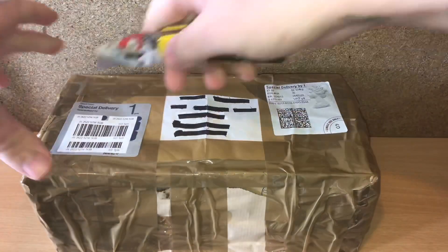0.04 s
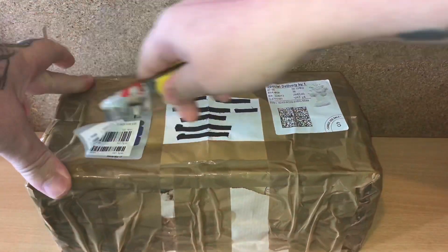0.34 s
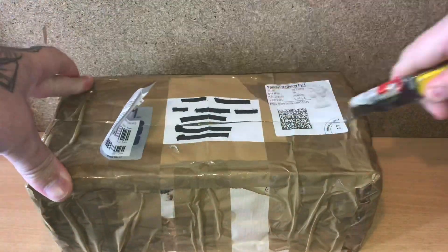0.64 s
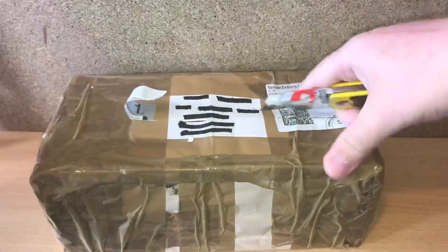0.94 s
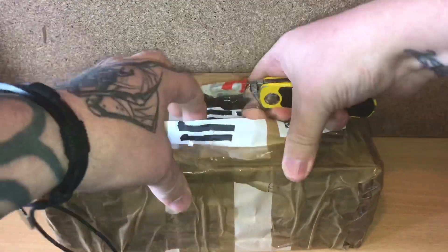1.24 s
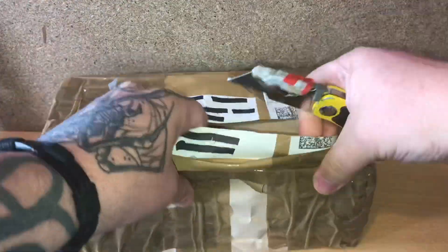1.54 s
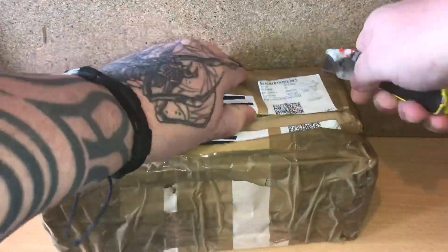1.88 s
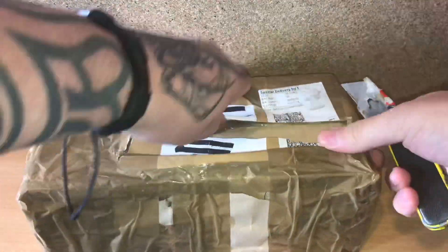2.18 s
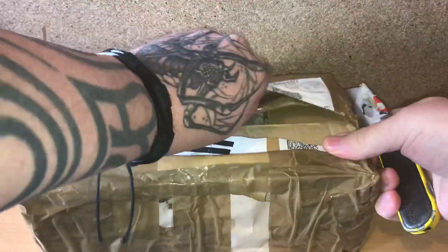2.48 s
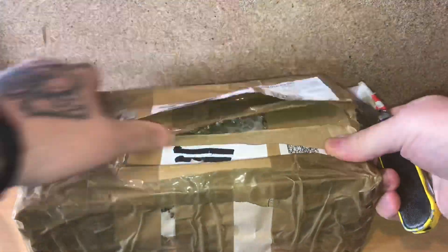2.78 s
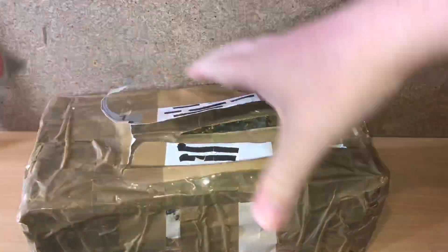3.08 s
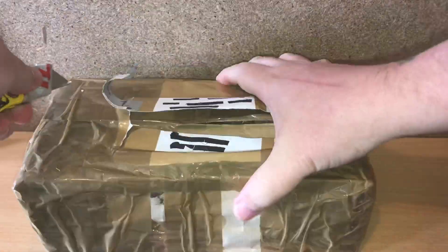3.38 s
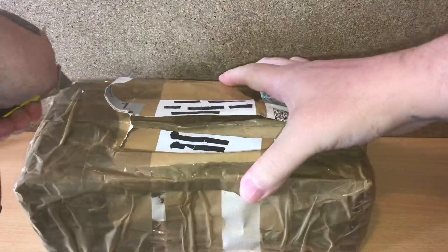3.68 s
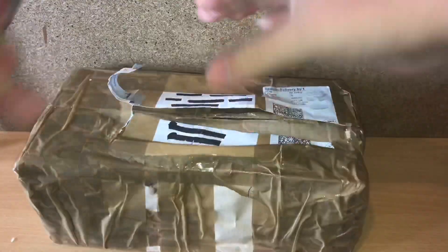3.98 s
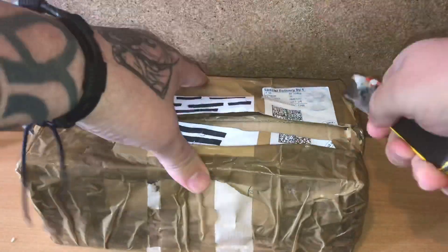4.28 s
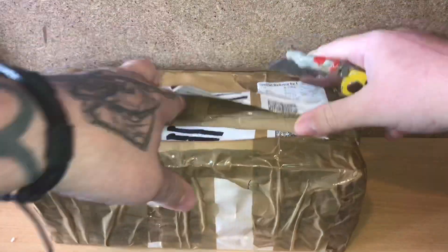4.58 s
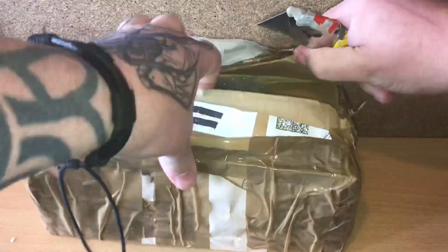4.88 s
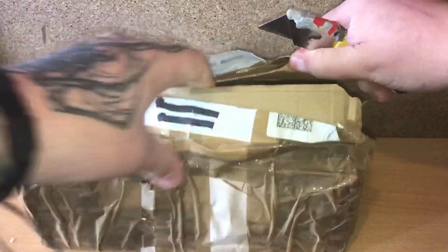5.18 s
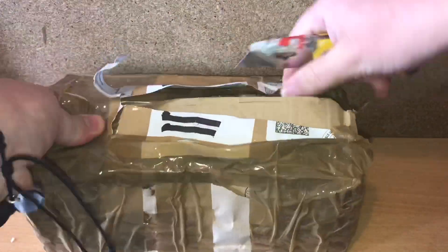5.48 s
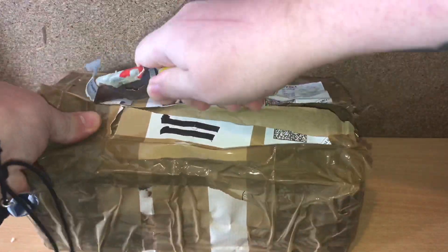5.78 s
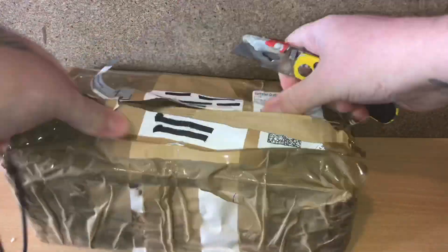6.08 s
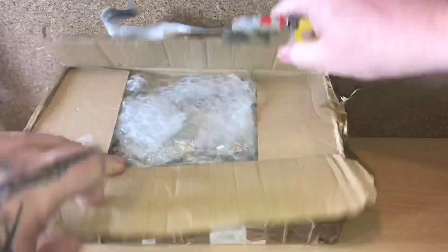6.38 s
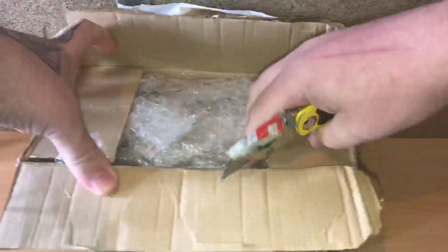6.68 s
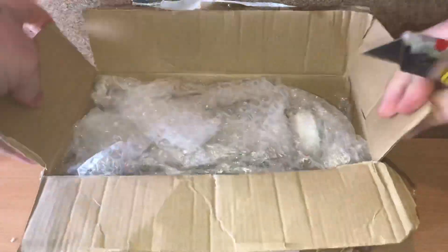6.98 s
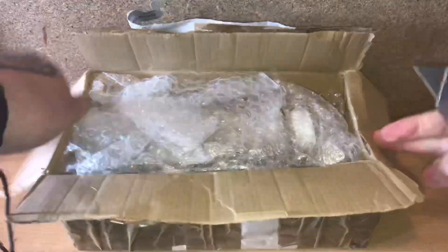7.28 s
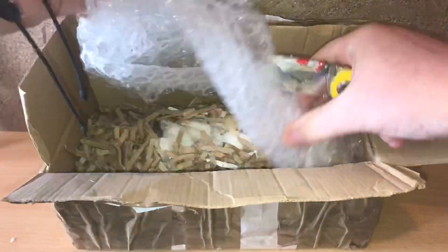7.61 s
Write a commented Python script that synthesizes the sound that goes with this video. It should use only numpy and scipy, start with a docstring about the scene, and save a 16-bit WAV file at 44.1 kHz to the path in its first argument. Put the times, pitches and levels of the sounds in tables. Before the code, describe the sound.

Close, dry scratching and crackling as a taped cardboard box is cut, snapped open and shifted on a desk in a quiet room.

```python
"""A utility knife scratches through packing tape: a cardboard parcel is opened on a wooden desk, close by
in a small, quiet room. The taut film snaps and rips as the lid is prised up, the box is dragged about,
the flaps pop open and bubble wrap rustles. Rubbing and tearing are stick-slip motion; each snap is a
sudden release of elastic energy. These excite the modes of the box and reflect off desk and wall."""
import sys
import numpy as np
from scipy import signal
from scipy.fft import rfft, irfft
from scipy.io import wavfile
from scipy.ndimage import uniform_filter1d

SR = 44100
rng = np.random.default_rng(int(sys.argv[2]) if len(sys.argv) > 2 else 0)


def inscribe(sig):
    """Save sig as 16-bit PCM at rate SR to the path in sys.argv[1].

    A 1-D sig is mono; a 2-D sig holds one channel per row.
    Samples are clipped to [-1, 1] before scaling.
    """
    pcm = np.round(np.clip(np.atleast_2d(sig).T, -1, 1) * 32767)
    wavfile.write(sys.argv[1], SR, pcm.astype(np.int16))


N = 341581
TIME = np.arange(N) / SR


def amp(db):
    """Amplitude ratio of a level in decibels."""
    return 10 ** (np.asarray(db) / 20)


def unit_rms(x):
    """Normalisation to a mean power of 1."""
    return x / np.sqrt(np.mean(x ** 2) + 1e-20)


def unit_energy(x):
    """Normalisation to a total energy of 1."""
    return x / np.sqrt(np.sum(x ** 2) + 1e-20)


def curve_at(points, hz):
    """Interpolation of (frequency [Hz], value) points on a logarithmic frequency axis."""
    f, value = np.transpose(points)
    return np.interp(np.log(hz + 1), np.log(f + 1), value)


def add(mix, start_s, sound):
    """Superposition of a sound on the mix."""
    part = mix[max(round(start_s * SR), 0):][:len(sound)]
    part += sound[:len(part)]


def band(x, low_hz, high_hz, order):
    """Causal Butterworth band-pass."""
    edges_hz = [low_hz, min(high_hz, .49 * SR)]
    return signal.sosfilt(signal.butter(order, edges_hz, "band", fs=SR, output="sos"), x)


def colour(x, spectrum, size=2048):
    """Minimum-phase filtering: the spectrum is shaped while clicks keep their sharp fronts."""
    log_gain = np.log(amp(curve_at(spectrum, abs(np.fft.fftfreq(size, 1 / SR)))))
    taps = np.fft.ifft(np.exp(np.conj(signal.hilbert(log_gain)))).real
    return signal.oaconvolve(x, taps[:size // 2])[:len(x)]


def wander(rate_hz):
    """Random modulation of rms 1, confined to the decade below rate_hz."""
    hz = np.fft.rfftfreq(N, 1 / SR)
    return unit_rms(irfft(rfft(rng.standard_normal(N)) * (hz < rate_hz) * (hz > rate_hz / 10), N))


# Background noise of the room: (frequency [Hz], relative spectral level [dB])
AIR_SPECTRUM = [(12, -28), (20, -5), (172, -14), (262, -16), (337, -19), (399, -18.5), (499, -25),
                (574, -21), (976, -20), (1530, -26.5), (1860, -22.5), (4060, -32), (16000, -36.5)]


def air(level_db=-69):
    """Stationary noise: the faint rumble and hiss of the room."""
    gain = amp(curve_at(AIR_SPECTRUM, np.fft.rfftfreq(N, 1 / SR)))
    return amp(level_db) * unit_rms(irfft(rfft(rng.standard_normal(N)) * gain, N))


# Reverberation time of the room: (frequency [Hz], T60 [s])
ROOM_DECAY = [(150, .38), (500, 0.22), (2000, 0.48), (6000, 0.24), (15000, 0.11)]


def room(x, early_db=-9.0, early_t60=0.051, tail_db=-32.5, turns_per_s=1.723, paths=4):
    """Early reflections off desk and wall shift as the hands move; faint diffuse reverberation follows."""
    t = np.arange(SR // 2) / SR
    early = 0
    for k in range(paths):
        taps = rng.standard_normal(len(t)) * (rng.random(len(t)) < .15) * (t > .0012)
        echoes = unit_energy(taps * amp(-60 * t / early_t60))
        weight = np.sqrt(2 / paths) * np.cos(np.pi * (turns_per_s * TIME + k / paths))  # squares sum to 1
        early = early + signal.oaconvolve(x * weight, echoes)[:N]
    hz, age, noise = signal.stft(rng.standard_normal(len(t)) * (t > .008), SR, nperseg=256)
    decay = amp(-60 * age / curve_at(ROOM_DECAY, hz)[:, None])
    tail = unit_energy(signal.istft(noise * decay, SR, nperseg=256)[1][:len(t)])
    return x + amp(early_db) * early + amp(tail_db) * signal.oaconvolve(x, tail)[:N]


# Modes of the box: (frequency [Hz], resonance gain [dB re direct sound], T60 [s])
BOX_MODES = [(168, -7.5, 0.047), (188.2, 1.5, 0.16), (250, -14, 0.45), (437, 6.5, 0.041),
             (1086, -6.5, 0.017), (1298, 1, 0.03), (1888, -24.5, 0.032), (2910, -7, 0.016),
             (3630, -10, 0.042), (3730, -21.5, 0.16), (4450, -22, 0.24)]


def box(x, gain_db=-1.0):
    """Modal resonance: panels and cavity ring as damped oscillators after each push."""
    t = np.arange(SR // 4) / SR
    response = signal.unit_impulse(len(t))
    for hz, mode_db, t60 in BOX_MODES:
        damping = np.log(1000) / t60
        response += amp(mode_db) * 2 * damping / SR * np.exp(-damping * t) * np.cos(2 * np.pi * hz * t)
    return amp(gain_db) * signal.oaconvolve(x, response)[:N]


# Low thuds of the box as it is bumped, tape rips and a flap pops open:
# (time [s], level [dB], frequency [Hz], T60 [s])
BOX_THUDS = [(0.209, -52, 320, 0.025), (1.486, -51, 189.5, 0.16), (2.555, -47.5, 173.9, 0.26),
             (2.582, -56, 93.4, 0.073), (3.978, -54, 500.4, 0.12), (4.349, -49.5, 200, 0.15),
             (4.36, -46, 445.6, 0.14), (4.584, -52, 524, 0.055), (5.031, -50.5, 115, 0.065),
             (5.972, -41, 491, 0.07), (6.198, -35, 210, 0.048), (6.198, -38, 79, 0.039)]


def thuds():
    """Free vibration: a sudden push sets one low, damped note going."""
    out, t = np.zeros(N), np.arange(SR // 4) / SR
    for start, level_db, hz, t60 in BOX_THUDS:
        add(out, start, amp(level_db - 60 * t / t60) * np.sin(2 * np.pi * hz * t))
    return out


def patch_ring(x, hz, q):
    """Local resonance: a small patch of card or film rings for a few cycles."""
    return signal.lfilter(*signal.iirpeak(min(hz, .45 * SR), q, SR), x)


def slip(creak, decay_s=0.00062):
    """Impulsive excitation: one tiny slip ticks and rings the patch it happens on."""
    t = np.arange(SR // 100) / SR
    tick = unit_energy(np.exp(-t / decay_s) * rng.standard_normal(len(t)))
    patch_hz = 900 * 16 ** rng.random()
    return unit_energy(tick + creak * unit_energy(patch_ring(tick, patch_hz, q=4.8)))


def moving_contact(x, depth_db=2.5):
    """Time-varying filtering: resonances come and go as the contact travels over the card."""
    spectra = signal.stft(x, nperseg=256)[2]
    patches = uniform_filter1d(rng.standard_normal(spectra.shape), size=4, axis=0)
    patches = uniform_filter1d(patches, size=12, axis=1)  # each lasts a few hundredths of a second
    return signal.istft(spectra * amp(depth_db * unit_rms(patches)), nperseg=256)[1][:len(x)]


def pressure(t, attack_s, start, length, level_db, swell_db, release_s=0.012):
    """Stroke envelope: contact builds, swells or eases by swell_db, passing level_db midway, and lets go."""
    age = t - start
    contact = np.clip(age / attack_s, 0, 1) * np.exp(-np.maximum(age - length, 0) / release_s)
    return contact * amp(level_db + swell_db * (np.clip(age / length, 0, 1) - .5))


def friction(strokes, spectrum, attack_s, gain_db, slips_per_s, spread_db, hiss, clump_db, creak):
    """Stick-slip friction: clumps of tiny slips over a smooth hiss; card gives the lows, film the top."""
    shape_count, split_hz = 32, 6500
    first, last = strokes[0][0], strokes[-1][0] + strokes[-1][1]
    t = TIME[round(first * SR):round((last + .06) * SR)]
    n = len(t)
    sizes = amp(spread_db * np.minimum(rng.exponential(1, n), 3))
    impulses = sizes * (rng.random(n) < slips_per_s / SR)
    shape = rng.integers(0, shape_count, n)
    slips = sum(signal.oaconvolve(impulses * (shape == k), slip(creak))[:n] for k in range(shape_count))
    drive = (unit_rms(slips) + hiss * rng.standard_normal(n)) * amp(clump_db * wander(rate_hz=110)[:n])
    sound = colour(moving_contact(drive), spectrum)
    card = unit_rms(band(sound, 60, split_hz, order=4))
    film = unit_rms(band(sound, split_hz, 21000, order=4))
    card_envelopes = [pressure(t, attack_s, *stroke) for *stroke, _ in strokes]
    film_envelopes = [envelope * amp(stroke[-1]) for envelope, stroke in zip(card_envelopes, strokes)]
    card *= np.linalg.norm(card_envelopes, axis=0)  # overlapping strokes add in power
    film *= np.linalg.norm(film_envelopes, axis=0)
    out = np.zeros(N)
    add(out, first, amp(gain_db) * (card + film))
    return out


# Rustles of wrap: (time [s], duration [s], level [dB], swell [dB], film hiss [dB re level])
WRAP_STROKES = [(7.32, 0.18, -54.5, -2.5, 0), (7.5, 0.221, -55.5, 3, 0)]
# Their spectrum: (frequency [Hz], gain [dB])
WRAP_SPECTRUM = [(150, -40), (250, -13), (273, -22), (429, -10), (576, -11), (1310, -5), (1550, -5),
                 (2320, -0.5), (6140, -9.5), (14900, 11), (16000, 5.5)]


def bubble_wrap():
    """Friction of thin film: a bright rustle."""
    return friction(WRAP_STROKES, WRAP_SPECTRUM, attack_s=0.0068, gain_db=-0.5,
                    slips_per_s=1800, spread_db=3.0, hiss=1.0, clump_db=1.9, creak=0.56)


# Card sliding on card: (time [s], duration [s], level [dB], swell [dB], film hiss [dB re level])
SCRAPE_STROKES = [(5.15, 0.032, -60, 5, -3), (5.335, 0.028, -49.5, -3, -4.5),
                  (6.36, 0.067, -57, 5.5, -13.5), (6.675, 0.17, -49.5, -11.5, -5.5),
                  (6.839, 0.225, -54, 4.5, -5.5), (7.081, 0.12, -56, -4.5, -3.5),
                  (7.22, 0.0768, -56, -3, 0)]
# Its spectrum: (frequency [Hz], gain [dB])
SCRAPE_SPECTRUM = [(150, -53), (250, -28), (300, -7), (430, -13), (600, -6), (1060, -5.5), (1550, -0.5),
                   (2300, 4), (3700, -4.5), (5500, -12), (8000, -14), (14400, -9), (16000, -7.5)]


def card_scrapes():
    """Sliding friction: slips of nearly equal size ring the card."""
    return friction(SCRAPE_STROKES, SCRAPE_SPECTRUM, attack_s=0.03, gain_db=-1.0,
                    slips_per_s=1500, spread_db=1.0, hiss=0.96, clump_db=3.0, creak=1.0)


# Flaps being opened: (time [s], duration [s], level [dB], swell [dB], film hiss [dB re level])
FLAP_STROKES = [(4.38, 0.4, -61.5, -8.5, -2), (4.611, 0.23, -60, 11, -1), (4.771, .1, -58, 5, 1.5),
                (4.871, 0.064, -60, -6, -1.5), (4.94, 0.14, -53, -3.5, -4), (5.098, 0.089, -50.5, -0.5, -4),
                (5.191, 0.28, -62, 5, 0.5), (5.48, 0.066, -78, -1, 2), (5.549, 0.42, -60, 8, -3),
                (5.824, 0.07, -48, 10.5, 0), (5.9, 0.17, -56.5, 3.5, -5), (6.058, 0.126, -53.5, -6, -4.5),
                (6.22, 0.2233, -55, 8.5, -2), (6.461, .21, -60, -2, -2.5)]
# Their spectrum: (frequency [Hz], gain [dB])
FLAP_SPECTRUM = [(71, -61), (120, -12), (196, -7), (327, -13), (436, -10.5), (605, -13.5), (670, -5),
                 (1320, -6), (2110, -6.5), (3660, -10), (6630, -19), (14700, -11.5), (16000, -9)]


def flaps():
    """Intermittent friction: the flaps catch and slide in slips of very uneven size."""
    return friction(FLAP_STROKES, FLAP_SPECTRUM, attack_s=0.01, gain_db=-0.5,
                    slips_per_s=800, spread_db=6.0, hiss=0.8, clump_db=4.0, creak=0.56)


# Box sliding on the desk: (time [s], duration [s], level [dB], swell [dB], film hiss [dB re level])
DRAG_STROKES = [(3.625, 0.2012, -43.5, 12, -8.5), (3.89, 0.029, -47, 2.22, -2), (3.97, 0.27, -71, 4.5, 0.5),
                (4.235, 0.13, -43, 3.4, -7)]
# Its spectrum: (frequency [Hz], gain [dB])
DRAG_SPECTRUM = [(71, -60), (120, -25), (200, -10.5), (314, -24), (445, -5), (513, -17.5), (700, -1.5),
                 (1370, -3.5), (2300, -1.5), (3900, -10), (5400, -23), (15000, -22), (16000, -16)]


def box_drag():
    """Sliding friction of card on wood: dense slips merge into a rasp."""
    return friction(DRAG_STROKES, DRAG_SPECTRUM, attack_s=0.025, gain_db=-1.0,
                    slips_per_s=3000, spread_db=4.0, hiss=0.9, clump_db=2.7, creak=0.36)


# Hands on the tape: (time [s], duration [s], level [dB], swell [dB], film hiss [dB re level])
TAPE_STROKES = [(1.94, .38, -60.5, 7.5, -3.5), (2.32, .4, -61, -1, 4.5), (2.719, .12, -60.5, -2.5, -2),
                (2.85, 0.2, -77, -5.5, 1), (3.07, .56, -71, -8.5, -3)]
# The crinkle's spectrum: (frequency [Hz], gain [dB])
TAPE_SPECTRUM = [(71, -57.5), (120, -15.5), (167, -2), (231, -16.5), (418, -15.5), (513, -12), (1320, -9.5),
                 (2480, -9), (3900, -18.5), (5520, -25.5), (16000, -20)]


def tape_crinkle():
    """Sparse stick-slip: tape crinkles under the hands."""
    return friction(TAPE_STROKES, TAPE_SPECTRUM, attack_s=0.012, gain_db=-1.0,
                    slips_per_s=450, spread_db=4.5, hiss=0.82, clump_db=1.5, creak=.8)


# Cuts of the knife: (time [s], duration [s], level [dB], swell [dB], film hiss [dB re level])
BLADE_STROKES = [(.15, 0.1486, -59.5, 22, -7), (.265, 0.34, -49, -5, -4.5), (0.531, 0.088, -45.5, -1, -15),
                 (.64, 0.19, -66.5, 3, -5), (.74, 0.0596, -57, 2, -7.5), (.85, 0.15, -75, 7, 0),
                 (.885, 0.051, -64, 9, -2.5), (1.005, 0.21, -54.5, 8, -7.5),
                 (1.198, .255, -51.5, -11.5, -0.5), (1.465, .18, -53, 0, 1.5), (1.67, .14, -56.5, 6, -5.5),
                 (1.818, 0.1, -48, 16, -6.5)]
# Their spectrum: (frequency [Hz], gain [dB])
BLADE_SPECTRUM = [(71, -59), (120, -22.5), (236, -12.5), (314, -24), (436, -12), (569, -17), (684, -2),
                  (1290, -5.5), (1550, -1.5), (6370, -20.5), (13500, -9.5), (16000, -13.5)]


def blade():
    """Cutting friction: the blade saws through tape in clumps of dry slips."""
    return friction(BLADE_STROKES, BLADE_SPECTRUM, attack_s=0.0138, gain_db=-1.5,
                    slips_per_s=1600, spread_db=2.5, hiss=0.98, clump_db=4.0, creak=0.24)


# Bands of a break, in the order body, thump, crack, film tick:
# (low edge [Hz], high edge [Hz], gain [dB], decay stretch [ratio])
FRACTURE_BANDS = [(861, 1960, -1.4, 0.82), (200, 774, -7, 2.8), (2040, 4400, -1, 1.6),
                  (9400, 19600, -0.88, 1.3)]


def fracture(force, body_db, crack_db, tick_db, tuning=1, ring=0, front=0):
    """Transient radiation: the envelope force(stretch) jolts, then shakes card and film in four bands."""
    thump_db = -17.5 - 0.43 * tick_db  # the more of a break is film, the less it pushes the box
    shares_db = [0, thump_db, crack_db, tick_db]
    card_hz, crack_hz = 1250, 2850 * 2 ** (0.18 * crack_db)  # the crack's note rises with its hardness
    notes_hz = [card_hz, card_hz, crack_hz, crack_hz]
    out = 0
    for share_db, hz, (low_hz, high_hz, gain_db, stretch) in zip(shares_db, notes_hz, FRACTURE_BANDS):
        envelope = force(stretch)
        drives = np.array([np.diff(envelope, prepend=0), envelope * rng.standard_normal(len(envelope))])
        ringing = ring * patch_ring(drives, hz * tuning, q=3.1)
        jolt, shake = band(drives + ringing, low_hz, high_hz, order=2)
        burst = unit_energy(front * unit_energy(jolt) + unit_energy(shake))
        out = out + amp(body_db + share_db + gain_db) * burst
    return out


def snap(body_db, crack_db, tick_db, decay_s, rise_s=.0001, scatter_octaves=0.15):
    """Release of elastic energy: taut film or a card edge lets go in a millisecond or so."""
    t = np.arange(SR // 30) / SR
    tuning = 2 ** (scatter_octaves * rng.standard_normal())
    force = lambda stretch: (1 - np.exp(-t / rise_s)) * np.exp(-t / (decay_s * stretch))
    burst = fracture(force, body_db, crack_db, tick_db, tuning, ring=0.83, front=0.96)
    return np.sqrt(SR / 1000) * burst  # levels refer to the rms over one millisecond


def crackle(strokes, per_s, offset_db, crack_db, tick_db, decay_s, max_snaps=14):
    """Poisson process: small random snaps follow each stroke's level and the brightness of its film."""
    out = np.zeros(N)
    for start, length, level_db, swell_db, hiss_db in strokes:
        ages = np.cumsum(rng.exponential(1, max_snaps)) / per_s
        scatters_db = rng.standard_normal((max_snaps, 3)) * [1.0, 0.5, 0.5]
        for age, scatter_db in zip(ages, scatters_db):
            if age < length:
                body_db = level_db + swell_db * (age / length - .5) + offset_db
                levels_db = np.array([body_db, crack_db, hiss_db + tick_db]) - scatter_db
                add(out, start + age, snap(*levels_db, decay_s))
    return out


def crackles():
    """Small-scale failure: film ticks as the blade parts it; creases in tape and flaps give way."""
    ticks = crackle(BLADE_STROKES, per_s=30, offset_db=-6.5, crack_db=2.0, tick_db=10.0, decay_s=0.00022)
    creases = crackle(TAPE_STROKES + FLAP_STROKES, per_s=14, offset_db=-2.0,
                      crack_db=3.5, tick_db=8.0, decay_s=.0003)
    return ticks + creases


# Tears in tape or card:
# (time [s], body level [dB], crack [dB re body], film tick [dB re body], duration [s])
TEARS = [(.288, -33.5, -9, 9, 0.021), (0.311, -40, 2, 6.5, 0.027), (0.354, -35.5, -9, 4, 0.03),
         (0.391, -37.5, -12, -7.5, 0.021), (0.773, -32, -12, -9, 0.0119), (0.813, -41.5, 7, 12, 0.0093),
         (1.228, -32.5, -12.5, -3.5, 0.0037), (2.42, -35.5, 10.5, 3.5, 0.00237),
         (2.381, -44.5, -7, -7.5, .008), (2.525, -31, -13, -2, 0.01), (2.535, -35, 4.5, 1.5, 0.007),
         (2.551, -27.5, -4, -15, .009), (2.58, -30.5, 2, -4.5, 0.011), (4.347, -38.5, -3, -2.5, 0.023),
         (6.198, -31.5, 0.5, -6.5, 0.0097), (7.282, -51.5, 11, -1.5, 0.0062)]


def rips(gain_db=-2.0, slips_per_s=520, slip_s=0.0019, fade=0.21):
    """Stick-slip tearing: a quick, uneven train of small breaks that weakens as it runs."""
    out = np.zeros(N)
    for start, *levels_db, length in TEARS:
        t = np.arange(round((length + .02) * SR)) / SR
        gaps, sizes = rng.uniform(.4, 1.6, (2, 64))
        onsets = (np.cumsum(gaps) - gaps[0]) / slips_per_s
        age = t[:, None] - onsets
        sizes = sizes * (onsets < length) * np.exp(-fade * onsets / length)
        force = lambda stretch: (np.exp(-abs(age) / (slip_s * stretch)) * (age >= 0)) @ sizes
        add(out, start, np.sqrt(length * SR) * fracture(force, *levels_db))
    return amp(gain_db) * out


# Single breaks of tape and card:
# (time [s], body level [dB], crack [dB re body], film tick [dB re body], decay time [s])
BREAKS = [(.2813, -39, 3, 7, .002), (0.2865, -31.5, 5, 6, .0007), (0.288, -31, 9, 9, 0.00059),
          (0.2942, -34, 5, 9, 0.00081), (.3009, -23, 0, 3.5, .0006), (.309, -21, 1.5, -2, 0.0006),
          (.3359, -48, 7, 7, 0.00036), (0.3553, -31, -18, -5, 0.00194), (0.365, -30, 0, 1, 0.0025),
          (0.3989, -22.5, -17, -11, 0.0005), (.4246, -35.5, -5, -10, 0.0015),
          (.5461, -38, -20, -12, 0.0013), (0.7412, -39.5, -2, -0.5, 0.002), (.7696, -43, 2, 15, .00015),
          (0.7732, -31.5, -2, 11, 0.0017), (0.7938, -30.5, 5.5, 1, 0.00017), (0.8008, -42, 4, 17, 0.000175),
          (0.8141, -27, 0, 3, .0014), (0.8202, -30.5, 4.5, 10.5, 0.0013), (1.082, -36, -23, -14, 0.00039),
          (1.1268, -27.5, -7, -7.5, 0.0015), (1.142, -46, 4, 1, .0003), (1.204, -49, -3, 11.5, 0.00023),
          (1.2219, -26.5, -0.5, -12, 0.0014), (1.2285, -28.5, 9, -1, 0.0018),
          (1.3561, -47.5, 7.5, 9, 0.0019), (1.3719, -26, 1, 12.5, 0.000145),
          (1.483, -27.5, -7, -4.5, 0.00099), (1.4934, -31, 0, -2.5, .0006), (1.5066, -51, 8, 17, .0003),
          (1.6257, -35.5, 12, 10.5, 0.000081), (1.823, -37.5, -1, -8, 0.0036),
          (1.8779, -45.5, 6.5, 4.5, 0.0018), (1.915, -28, -2.5, -11, 0.0045),
          (2.0591, -36.5, -6, -10, 0.00031), (2.1076, -22, -7.5, -9.5, 0.00068),
          (2.1131, -29.5, -0.5, 3.5, 0.00079), (2.167, -34, -6.5, -12, 0.00203),
          (2.208, -37, -1.5, -20, 0.0024), (2.269, -33, -17, -11, 0.00115),
          (2.289, -40, -3.5, -5.5, 0.0016), (2.369, -49, 8, 20, .0002), (2.3826, -17.5, -1.5, 0, 0.00089),
          (2.418, -40, 2, 4, .0011), (2.4239, -24, -8, 9.5, 0.0009), (2.451, -27, 1, 10, 0.00061),
          (2.5037, -31.5, 4, 11.5, 0.00032), (2.5157, -25.5, 10.5, 13, 0.000213),
          (2.5191, -15, -1.5, -2, 0.00022), (2.5328, -24.5, 10, 8.5, 0.00108),
          (2.539, -21.5, 7.5, -17, 0.0019), (2.5528, -25, -15, 6.5, .001), (2.5805, -14.5, -2.5, 2, 0.0016),
          (2.617, -50, 4, 25, 0.000214), (2.6251, -29, 9, 16, 0.00038), (2.688, -43, 3.5, 3, 0.00167),
          (2.758, -45.5, -3, -1, 0.00106), (2.813, -46.5, -3, -1, .0006), (2.851, -56.5, -10.5, 9.5, .0002),
          (2.939, -65.5, -4, 23.5, 0.000193), (2.9723, -60.5, -0.5, 13, .0002),
          (3.2832, -61.5, 4, -1, 0.000189), (3.326, -57.5, 3.5, -9, 0.0011),
          (3.411, -64.5, 4, 12.5, 0.00016), (3.546, -60.5, 10.5, 7.5, .0004),
          (3.5848, -52, 3.5, -9.5, 0.00068), (3.7646, -27, -29, -15, .0008),
          (3.8327, -26.5, -2, -26, 0.0027), (3.9769, -44, 2, -4.5, 0.0039), (4.1405, -48, -2, 2.5, 0.0027),
          (4.2664, -46, 10, 8, 0.00082), (4.3136, -41, 3, -38, 0.0031), (4.367, -31, -5, -34, 0.00104),
          (4.4795, -37, -15.5, -8.5, .0007), (4.5173, -43, -2, -20, 0.00032),
          (4.5247, -29.5, -17, -14, 0.00018), (4.6635, -38, -2.5, -7, .0017), (4.726, -41.5, 2, -8, 0.0013),
          (4.7813, -46.5, 11, 2, 0.00021), (4.809, -35.5, 1, -8.5, 0.0022),
          (4.8143, -36, 8.5, 1.5, 0.00024), (4.8422, -46, 3, 0, 0.00054), (5.0304, -13.5, 0, -8, .00055),
          (5.0795, -53, 14, 13.5, 0.00083), (5.1368, -59, 0, 21, 0.00022), (5.1607, -49, 4.5, 4, 0.00062),
          (5.1866, -36.5, 2.5, -3, 0.00092), (5.284, -40.5, -1, -26, 0.0018),
          (5.4644, -47, 4.5, 5.5, 0.0021), (5.5562, -51, -1, -20, 0.00257), (5.768, -53, 9, 9, 0.000174),
          (5.7855, -42, -0.5, -5.5, .0009), (5.837, -41.5, 3, -3, 0.00066), (5.878, -31, -2, -11.5, 0.0036),
          (5.9262, -39, 0.5, -5, 0.002), (6.0773, -35.5, -4, -12, 0.0018), (6.1526, -35, 0, 0.5, 0.00054),
          (6.1682, -27, 9, 3, 0.00026), (6.199, -14.5, 1, -3.5, 0.00089), (6.2043, -15, -30, -29, 0.0012),
          (6.333, -44.5, 10, 5, 0.0015), (6.4252, -44.5, 10.5, -16.5, 0.00089),
          (6.5178, -33.5, 0, -7.5, 0.0028), (6.64, -44, 3, -26, 0.00252), (6.9579, -45, -10.5, 2, 0.000984)]


def snaps():
    """Fracture under tension: tape and card give way in separate sharp snaps."""
    out = np.zeros(N)
    for start, *levels_db, decay_s in BREAKS:
        add(out, start, snap(*levels_db, decay_s))
    return out


def scene():
    """Source and filter: breaks and friction ring the box, then join the thuds in the room."""
    breaking = snaps() + crackles() + rips()
    rubbing = blade() + tape_crinkle() + box_drag() + flaps() + card_scrapes() + bubble_wrap()
    parcel = box(breaking + rubbing) + thuds()
    return (room(parcel) + air())[None]


def record(dry, cutoff_hz=16050):
    """Band limiting: a linear-phase low-pass removes the highest treble."""
    low_pass = signal.firwin(401, cutoff_hz, window=("kaiser", 7), fs=SR)
    return signal.oaconvolve(dry, low_pass[None], "same")


dry = scene()
out = record(dry)
inscribe(out)
```